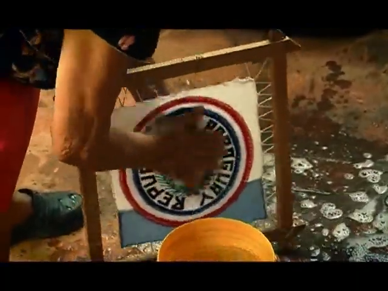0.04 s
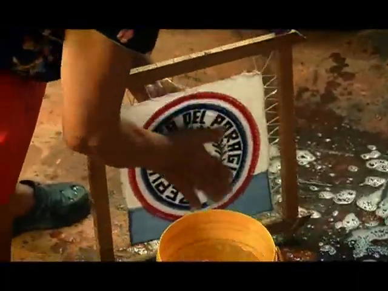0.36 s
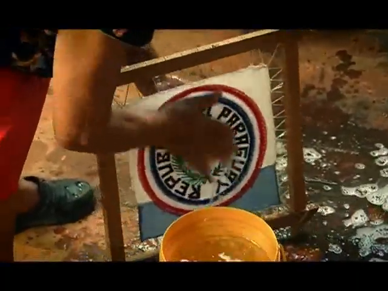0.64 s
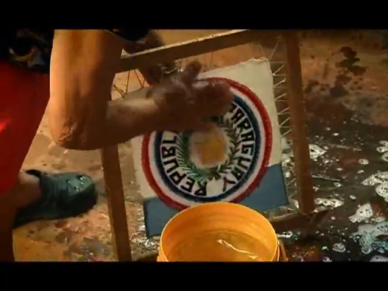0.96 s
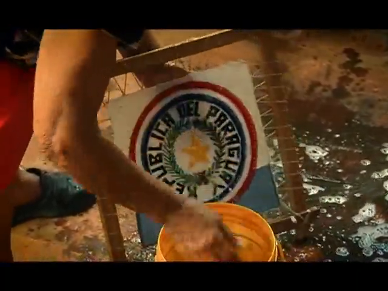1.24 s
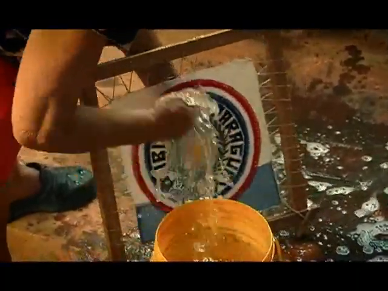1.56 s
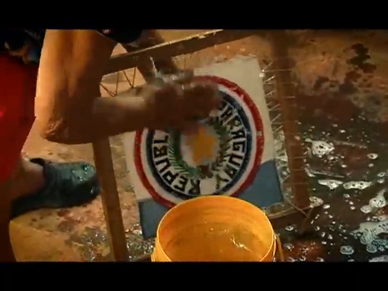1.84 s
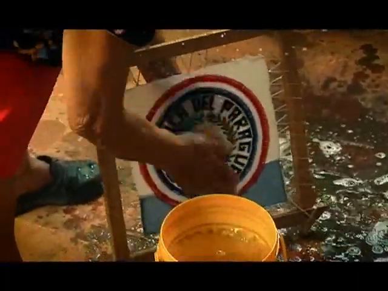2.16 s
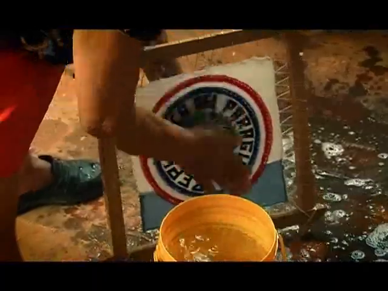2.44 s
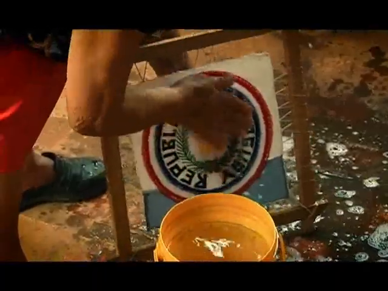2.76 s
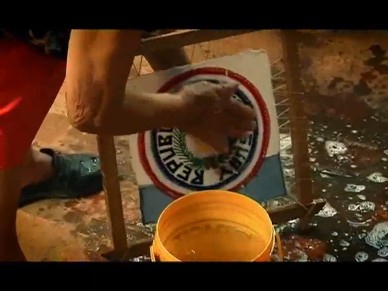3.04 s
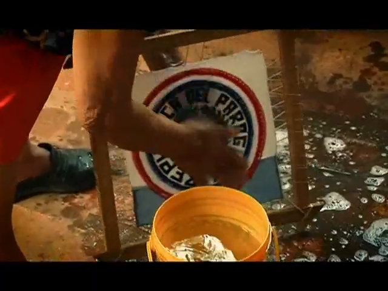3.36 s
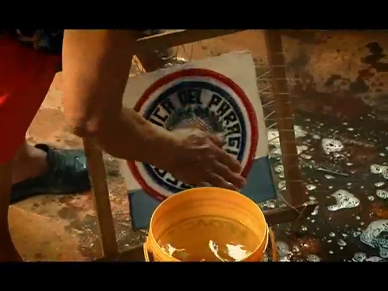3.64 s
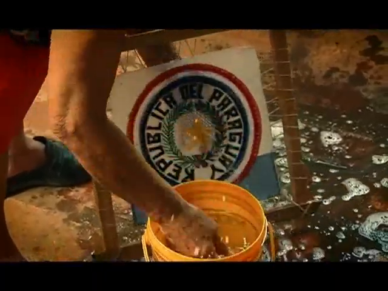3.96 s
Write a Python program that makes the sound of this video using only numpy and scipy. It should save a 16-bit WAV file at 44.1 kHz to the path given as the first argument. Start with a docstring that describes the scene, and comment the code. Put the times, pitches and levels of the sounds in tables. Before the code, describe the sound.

Close, rapid scrubbing of a hand on taut wet cloth swishes and crackles with foam in a quiet yard. Water is scooped once from a bucket, splashing and bubbling, before the rubbing resumes. A faint bird chirps at the end.

```python
"""A hand scrubs soapy wet cloth stretched on a frame, about four to-and-fro strokes a second, close by.
Each stroke swishes and crackles; some squeeze out a squelch or drum the cloth, and foam bubbles snap.
Once the hand scoops water from a bucket and slops it on the cloth: spray, ringing bubbles, a trickle.
Behind it lies a quiet yard with a short echo, and a distant bird calls at the end."""
import sys
import numpy as np
from scipy import signal
from scipy.fft import rfft, irfft
from scipy.io import wavfile

SR = 44100
rng = np.random.default_rng(int(sys.argv[2]) if len(sys.argv) > 2 else 0)


def unload_wav(signal):
    """Save mono or channel-first audio to the path in sys.argv[1] as 16-bit WAV at rate SR, clipped to [-1, 1]."""
    wavfile.write(
        sys.argv[1],
        SR,
        np.round(np.clip(np.atleast_2d(signal).T, -1, 1) * 32767).astype(np.int16),
    )


N = 176400
T = np.arange(N) / SR

# tone of the yard's ambience (frequency [Hz], gain [dB])
YARD_EQ = [(25, -15), (50, -12), (100, -0.5), (300, -2.5), (700, -4), (2000, -12.5), (5000, -20.5),
           (10000, -22.5), (16000, -30)]
# bird notes (time [s], length [s], start pitch [Hz], end pitch [Hz], level [dB])
BIRD_NOTES = [(3.719, 0.22, 3620, 3600, -55.5), (3.881, .055, 3500, 2150, -47),
              (3.898, 0.0427, 4750, 3580, -48), (3.983, 0.037, 1950, 1560, -41)]
# splashes in the bucket and on the cloth (time [s], swell [s], fade [s], level [dB], treble [dB])
SPLASH_HITS = [(1.245, 0.0012, 0.0074, -40.5, 11.5), (1.257, .004, 0.028, -49.5, 8.5),
               (1.323, 0.0022, 0.014, -31, 3.5), (1.339, 0.0023, 0.025, -34, -5),
               (1.418, 0.0047, 0.0048, -20, -13.5), (1.437, 0.018, 0.047, -36.5, -8.5),
               (1.63, 0.03, 0.026, -42, -1), (1.481, 0.01, 0.011, -22.5, -16),
               (1.51, 0.017, 0.058, -36, -17), (1.688, 0.021, 0.043, -25, -3)]
# tone of the spray (frequency [Hz], gain [dB])
SPLASH_EQ = [(100, -20), (500, -13), (1000, -2), (2000, 1.5), (3500, 1), (6000, 2), (10000, -3),
             (16000, -13.5)]
# drops landing on wet ground (time [s], level [dB])
GROUND_DROPS = [(.671, -50), (1.225, -50), (1.287, -52), (3.851, -36)]
# air bubbles ringing in the bucket (time [s], peak [dB], pitch [Hz], ring [s], attack [s])
BUCKET_BUBBLES = [(1.2445, -26, 5100, 0.0093, 0.00057), (1.323, -26, 5800, 0.0074, 0.00041),
                  (1.339, -27.5, 2170, 0.0093, 0.00091), (1.385, -29.5, 694, 0.017, 0.0013),
                  (1.4, -29, 560, 0.027, 0.00032), (1.419, -20.5, 3340, 0.017, 0.00031),
                  (1.459, -29, 770, 0.014, 0.0014), (1.4696, -13, 1048, 0.025, 0.00028),
                  (1.4691, -20.5, 1560, 0.012, .0003), (1.4695, -25, 2270, .012, 0.00063),
                  (1.48, -37, 980, 0.033, .001), (1.516, -21, 833, 0.026, 0.0058),
                  (1.529, -31, 1080, .025, 0.0023), (1.555, -30, 3800, .018, .001),
                  (1.604, -24.5, 3210, .015, 0.0013), (1.605, -25, 1750, 0.015, .001),
                  (1.641, -29, 2240, .018, .001), (1.652, -27, 2900, 0.0099, .001),
                  (1.765, -33, 1340, .015, .001), (3.956, -34, 830, 0.038, 0.0016)]
# resonances of the stretched cloth (frequency [Hz], width [Hz], gain [dB])
CLOTH_MODES = [(101.2, 29, -1.5), (133, 16, -2.5), (192, 42, -3.5), (225.6, 32, 3.5), (297.3, 44, 5),
               (370, 80, -39)]
# volume curve of the cloth's drone (time [s], relative level [dB])
DRONE_CURVE = [(0.0, -66), (0.3, -55), (1.02, -52), (1.09, -61), (1.14, -49.5), (1.57, -54.5), (1.82, -44),
               (2.08, -58), (2.13, -49.5), (2.61, -50), (2.72, -43), (3.21, -51.5), (3.59, -42),
               (4.0, -50.5)]
# the palm bumps the taut cloth (time [s], relative level [dB], pitch [Hz])
PALM_BUMPS = [(.274, -44, 603), (.404, -40, 520), (0.566, -30.5, 560), (.742, -54, 600), (.972, -37, 626),
              (1.079, -30, 390), (1.157, -43.5, 440), (2.135, -38.5, 357), (2.545, -46, 414),
              (2.661, -37.5, 394), (2.857, -40.5, 394), (3.05, -39.5, 610), (3.295, -41, 553),
              (3.37, -36, 370), (3.603, -33, 430)]
# foam bubbles snapping (time [s], level before the low cut [dB], pitch [Hz])
FOAM_SNAPS = [(.0055, -17, 5500), (0.0402, -9.5, 5160), (.273, -10.5, 1960), (0.5093, -23, 4500),
              (0.7448, -6, 3450), (1.677, -19, 4500), (1.708, -16, 4500), (1.722, -14, 7500),
              (1.7555, -22, 9000), (1.7816, -5, 9150), (1.785, -8.5, 8640), (1.792, -24, 6000),
              (1.839, -16, 6450), (1.917, -19, 5000), (1.924, -23, 7500), (1.954, -7, 6500),
              (1.988, -18, 9000), (2.3575, -11, 8300), (2.395, -20.5, 9900), (2.5705, -26, 4030),
              (2.604, -6, 8300), (2.7405, -25, 8000), (2.8545, -13.5, 10800), (3.063, -9, 4070),
              (3.0916, -8, 10700), (3.3405, -16.5, 10300), (3.571, -14.5, 8900)]
# water squeezed from under the hand (time [s], length [s], level [dB], treble [dB])
SQUELCH_HITS = [(0.035, 0.0074, -24.5, -2.5), (.254, 0.0061, -34, -14), (.268, 0.0077, -21.5, -7),
                (0.331, 0.0091, -29.5, -9), (0.503, 0.0089, -29.5, 2.5), (0.566, 0.007, -32, -6),
                (0.7402, 0.0072, -21.5, -3), (0.804, 0.0078, -35, -18), (0.971, 0.0094, -31.5, 1),
                (1.074, 0.0033, -42, 2), (1.782, .012, -27, -5), (2.086, 0.0023, -21.5, -7),
                (2.169, 0.0021, -24, -10), (2.329, .004, -25, -4), (2.402, 0.0064, -30.5, -8),
                (2.565, 0.0098, -25.5, -11), (2.639, 0.0082, -33.5, -1.5), (2.761, .005, -37, -4),
                (2.818, .013, -28, -6), (2.919, 0.0034, -32, 0), (3.049, 0.012, -27.5, -4),
                (3.057, 0.012, -24, -5.5), (3.293, .011, -25, -11), (3.534, 0.0054, -32, 7),
                (3.549, 0.0035, -30.5, -12)]
# tone of a squelch (frequency [Hz], gain [dB])
SQUELCH_EQ = [(100, -31), (500, -9.5), (900, -11), (1600, 0.5), (3300, 1.5), (6500, -1), (11000, -14),
              (16000, -20)]
# rubbing strokes, cued at their fastest moment (time [s], swell [s], fade [s], level [dB], treble [dB])
RUB_STROKES = [(.04, .028, 0.022, -31, 0.5), (.125, 0.032, 0.049, -36.5, 0), (.28, 0.06, 0.059, -35.5, -1),
               (0.34, 0.0073, 0.069, -35, -4), (.505, 0.038, 0.043, -36, 0.5),
               (0.586, 0.026, 0.047, -37.5, 1.5), (.745, 0.047, 0.031, -35.5, 2.5),
               (.818, 0.017, 0.052, -36.5, 1), (0.98, 0.036, 0.019, -34, -2), (1.078, 0.053, 0.032, -37, 2),
               (1.8, 0.027, 0.069, -33, 4.5), (1.953, 0.046, 0.035, -34, 7.5),
               (2.075, 0.046, 0.022, -35.5, 9.5), (2.185, 0.044, 0.055, -36.5, 5),
               (2.325, 0.027, 0.03, -30.5, 3), (2.437, 0.022, 0.036, -35, 4.5),
               (2.567, 0.044, .04, -34, 0.5), (2.675, 0.028, 0.039, -36, 1.5),
               (2.825, 0.079, 0.049, -38, 3), (2.926, 0.043, 0.033, -37, 3.5),
               (3.062, 0.051, .035, -34, -4.5), (3.173, 0.033, 0.024, -38.5, -0.5),
               (3.299, 0.029, 0.017, -31, -4), (3.383, .015, 0.019, -36, 1), (3.43, 0.033, 0.012, -39, 5),
               (3.54, 0.051, 0.022, -35, 2.5), (3.655, 0.078, 0.054, -37.5, 1),
               (3.76, 0.02, 0.035, -44.5, -5), (3.96, 0.04, 0.034, -39, 4)]
# tone of skin on wet weave (frequency [Hz], gain [dB])
RUB_EQ = [(60, -35), (200, -8.5), (500, -7), (900, -5), (1600, -0.5), (2800, 2), (4500, -2.5), (7000, -5.5),
          (11000, -13), (14000, -18.5), (16000, -27)]
# the hand stops to turn round (time [s])
HAND_TURNS = [.088, 0.194, .43, .552, .657, .79, 0.898, 1.02, 1.885, 2.13, 2.5, 2.752, 2.98, 3.222, 3.358,
              3.467, 3.592]


def amp(db):
    """Decibels to gain."""
    return 10 ** (np.asarray(db) / 20)


def unit(x):
    """Scale to rms 1."""
    return x / np.sqrt(np.mean(x ** 2) + 1e-20)


def add(out, at, x):
    """Mix x in at a cue time."""
    i = int(np.clip(round(at * SR), 0, N - 1))
    out[i:i + len(x)] += x[:N - i]


def colour(x, points):
    """Minimum-phase EQ through (Hz, dB) points; rms 1."""
    hz, db = np.array(points, float).T
    curve_db = np.interp(np.log(np.fft.rfftfreq(N, 1 / SR) + 1), np.log(hz), db)
    cepstrum = irfft(np.log(amp(curve_db)), N)
    cepstrum[1:N // 2] *= 2
    cepstrum[N // 2 + 1:] = 0
    return unit(irfft(rfft(x) * np.exp(rfft(cepstrum)), N))


def butter(x, hz, kind, order=2):
    """Plain low-, high- or band-pass."""
    sos = signal.butter(order, np.clip(hz, 10, SR / 2 - 100), kind, fs=SR, output="sos")
    return signal.sosfilt(sos, x)


def crackle(per_s, spread_db, pitches=48, pop_cycles=16, pop_share=.63):
    """Tiny water films and bubbles burst: dry clicks and pitched pops, a few far louder than the rest."""
    def bursts(chance):
        size, sign = rng.exponential(size=N), rng.choice([-1, 1], N)
        return (chance < per_s / SR) * sign * amp(spread_db * np.minimum(size, 5))
    clicks, kicks = bursts(rng.random(N)), bursts(rng.random(N))
    pitch_index, pops = rng.integers(0, pitches, N), np.zeros(N)
    for k, hz in enumerate(np.linspace(np.sqrt(600), np.sqrt(16000), pitches) ** 2):
        radius = np.exp(-np.log(1000) * hz / (pop_cycles * SR))
        resonator = [1, -2 * radius * np.cos(2 * np.pi * hz / SR), radius * radius]
        drive = kicks * (pitch_index == k) + 1e-18 * clicks
        pops += hz ** .25 * unit(signal.lfilter([1, 0, -1], resonator, drive))
    return np.sqrt(1 - pop_share) * unit(clicks) + np.sqrt(pop_share) * unit(pops)


def play(grain, gestures, crossover_hz=5500, dulling=.12):
    """Ride a texture with (envelope, level dB, treble dB) gestures; slow motion sounds duller."""
    low = irfft(rfft(grain) / (1 + (np.fft.rfftfreq(N, 1 / SR) / crossover_hz) ** 4), N)
    body, top = np.zeros(N), np.zeros(N)
    for env, db, treble_db in gestures:
        power = env ** 2
        power = power * amp(db) ** 2 * power.sum() / (np.sum(power * grain ** 2) + 1e-12)
        body += power
        top += power * amp(treble_db) ** 2 * env ** dulling
    return low * np.sqrt(body) + (grain - low) * np.sqrt(top)


def swell(at, rise, fade):
    """Envelope that builds to a pointed peak, then fades."""
    distance = np.maximum((at - T) / rise, (T - at) / fade)
    return np.exp(-np.minimum(distance ** .95, 20))


def spurt(at, length, attack_s=.00067, release_s=.0015):
    """Envelope with a hard attack, short hold and quick release."""
    return np.clip((T - at) / attack_s, 0, 1) * np.exp(-np.clip((T - at - length) / release_s, 0, 20))


def ring(hz, t60, attack_s, rise=0):
    """A dying tone, peak 1, whose pitch climbs by the share `rise` over its ring time."""
    t = T[:int(t60 * SR * 2) + 2]
    tone = np.sin(2 * np.pi * hz * (t + rise * t ** 2 / (2 * t60)))
    ping = tone * np.exp(-np.log(1000) * t / t60) * (1 - np.exp(-(t / attack_s) ** 2))
    return ping / np.abs(ping).max()


def yard_bed(level_db=-53.5):
    """A steady, dark bed of outdoor noise."""
    return amp(level_db) * colour(rng.standard_normal(N), YARD_EQ)


def yard_echo(sound, level_db=-15.5, t60=.37, high_cut_hz=3030, predelay_s=.004):
    """The yard throws back a short, soft-topped tail."""
    t = T[:SR // 2]
    wash = butter(rng.standard_normal(len(t)), high_cut_hz, "low", order=1)
    tail = wash * np.exp(-np.log(1000) * t / t60) * (t > predelay_s)
    return amp(level_db) * signal.fftconvolve(sound, tail / np.linalg.norm(tail))[:N]


def bird():
    """Faint whistles that slide down and level off."""
    out = np.zeros(N)
    for at, length, start_hz, end_hz, db in BIRD_NOTES:
        progress = np.linspace(0, 1, int(length * SR))
        hz = end_hz + (start_hz - end_hz) * (1 - progress) ** 3
        arch = np.sqrt(4 * progress * (1 - progress))
        add(out, at, amp(db) * arch * np.sin(2 * np.pi * np.cumsum(hz) / SR))
    return out


def water(drop_s=.0038, bubble_rise=.16, trickle_bubbles=36, trickle_hz=1137):
    """The hand dips and scoops: spray, stray drops, ringing air bubbles and a trickle."""
    splashes = [(swell(at, rise, fade), db, treble) for at, rise, fade, db, treble in SPLASH_HITS]
    drops = [(swell(at, drop_s / 10, drop_s), db, 5) for at, db in GROUND_DROPS]
    spray = colour(crackle(per_s=2500, spread_db=4), SPLASH_EQ)
    out = play(spray, splashes + drops)
    for at, db, hz, t60, attack_s in BUCKET_BUBBLES:
        add(out, at, amp(db) * ring(hz, t60, attack_s, bubble_rise))
    # water trickles back from the hand in a quick scatter of plinks
    cues = rng.uniform(1.47, 1.71, trickle_bubbles)
    for at, (pitch, size) in zip(cues, rng.standard_normal((trickle_bubbles, 2))):
        plink = ring(trickle_hz * 2 ** (.585 * pitch), t60=.033, attack_s=.0013, rise=bubble_rise)
        add(out, at, amp(-39.5 + 2.3 * size) * plink)
    return out


def cloth(drone_trim_db=-3.5, rustle_trim_db=-2, knock_trim_db=4.5, rustle_octaves=.67):
    """The taut cloth drones in its low modes and gives a hollow knock under the palm."""
    drag = rng.standard_normal(N)
    modes = sum(amp(db) * unit(butter(drag, [hz - width / 2, hz + width / 2], "band", order=1))
                for hz, width, db in CLOTH_MODES)
    drone_db = np.interp(T, *np.array(DRONE_CURVE).T) + drone_trim_db
    out = unit(butter(modes, 84, "high", order=6)) * amp(drone_db)
    decay = np.exp(-T[:SR // 5] / .024)
    for at, db, hz in PALM_BUMPS:
        push = rng.standard_normal(len(decay)) * decay
        rustle = butter(push, [hz / 2 ** rustle_octaves, hz * 2 ** rustle_octaves], "band")
        add(out, at, amp(db + rustle_trim_db) * unit(rustle) * np.sqrt(np.mean(decay ** 2)))
        add(out, at, amp(db + knock_trim_db) * ring(hz, t60=.022, attack_s=.0019))
    return out


def snaps(cycles=4.5, reflection_s=.00096, reflection_db=-3.5, low_cut_hz=1470):
    """Single foam bubbles burst with a sharp tick and a close reflection."""
    out = np.zeros(N)
    for at, db, hz in FOAM_SNAPS:
        tick = amp(db) * ring(hz, t60=cycles / hz, attack_s=1 / SR)
        add(out, at, tick)
        add(out, at + reflection_s, amp(reflection_db) * tick)
    return butter(out, low_cut_hz, "high")


def squelches():
    """Water squeezes out in short, dense spurts of pops where the stroke presses hardest."""
    grain = colour(crackle(per_s=5000, spread_db=3), SQUELCH_EQ)
    return play(grain, [(spurt(at, length), db, treble) for at, length, db, treble in SQUELCH_HITS])


def rubbing(swish_share=.35, turn_s=.01, turn_db=-9):
    """Skin slides on the wet weave: a swish full of foam crackle that ducks at each turn of the hand."""
    swish = np.sqrt(swish_share) * rng.standard_normal(N)
    foam = np.sqrt(1 - swish_share) * unit(crackle(per_s=2600, spread_db=4))
    strokes = [(swell(at, rise, fade), db, treble) for at, rise, fade, db, treble in RUB_STROKES]
    duck_db = turn_db * sum(np.exp(-((T - at) / turn_s) ** 2) for at in HAND_TURNS)
    return play(colour(swish + foam, RUB_EQ), strokes) * amp(duck_db)


def scene():
    """Mono mix: the scrubbing, water and bird with their echo, over the yard's bed."""
    direct = rubbing() + squelches() + snaps() + cloth() + water() + bird()
    return (direct + yard_echo(direct) + yard_bed())[None]


def record(dry, high_cut_hz=16100):
    """The recorder cuts the very top steeply."""
    return signal.sosfilt(signal.ellip(8, .2, 70, high_cut_hz, fs=SR, output="sos"), dry)


dry = scene()
out = record(dry)
unload_wav(out)
```